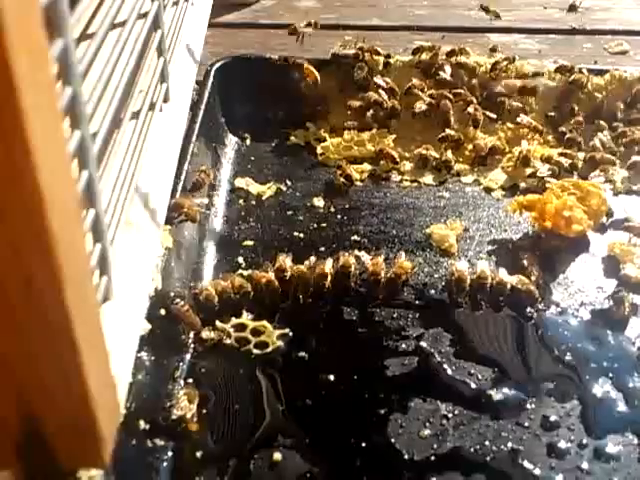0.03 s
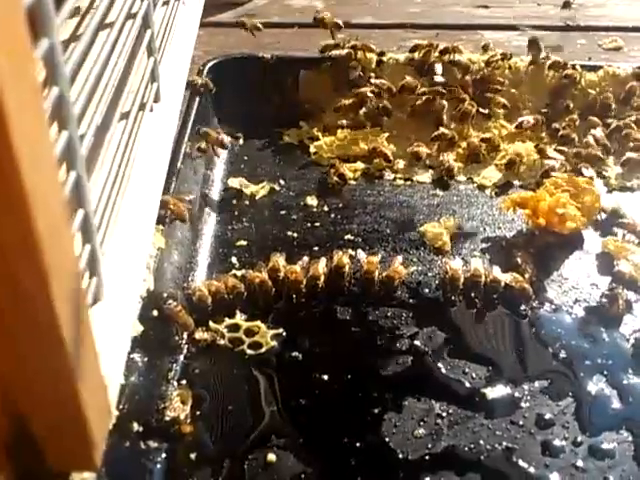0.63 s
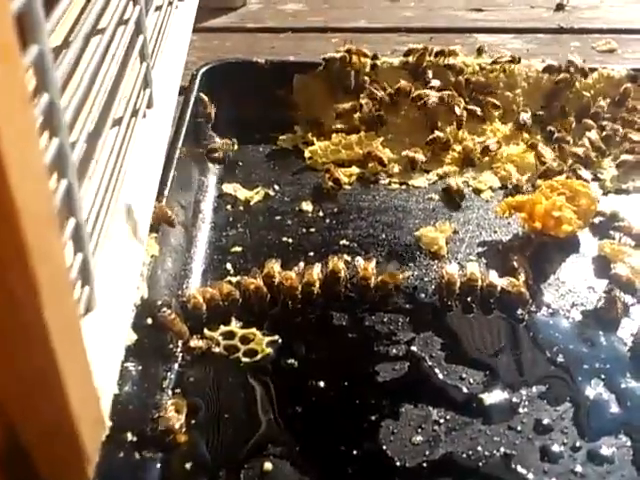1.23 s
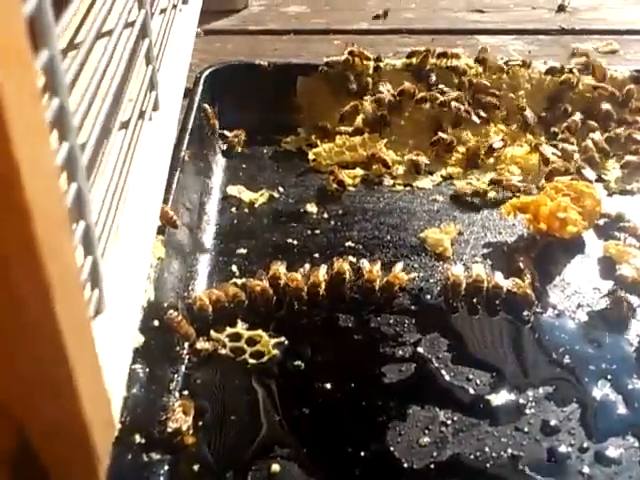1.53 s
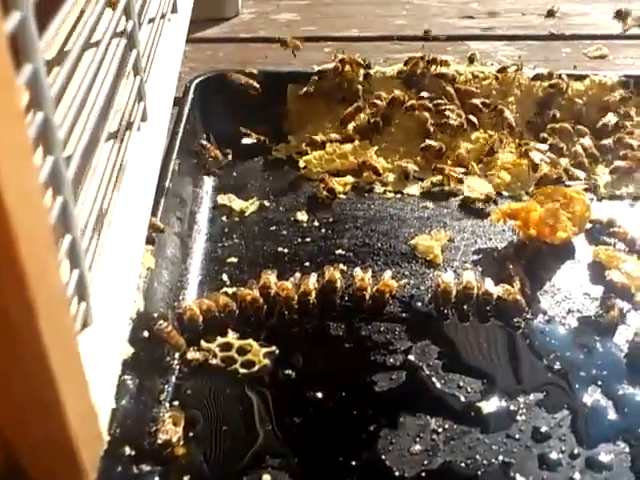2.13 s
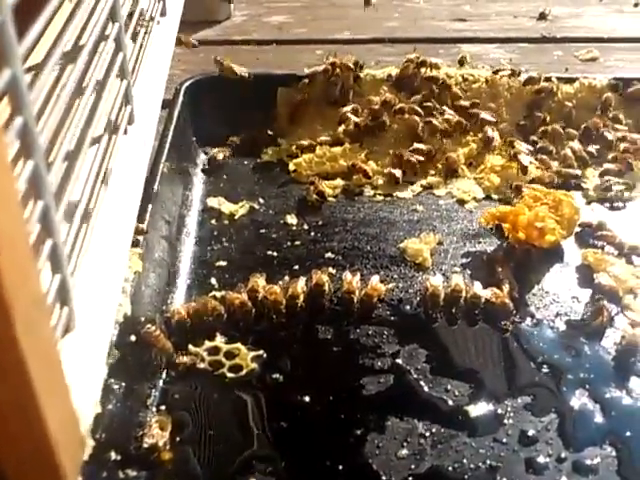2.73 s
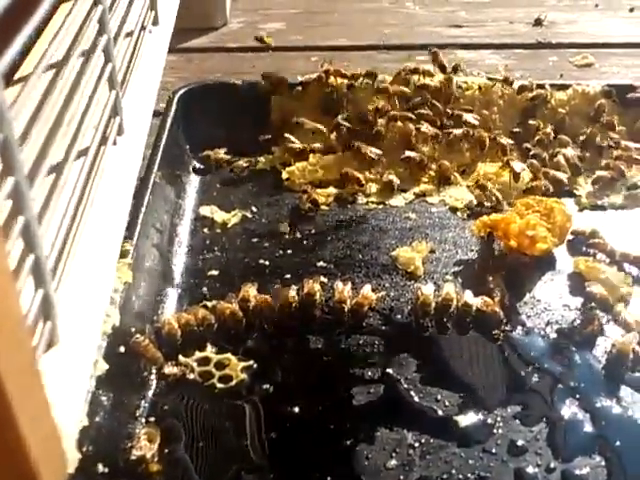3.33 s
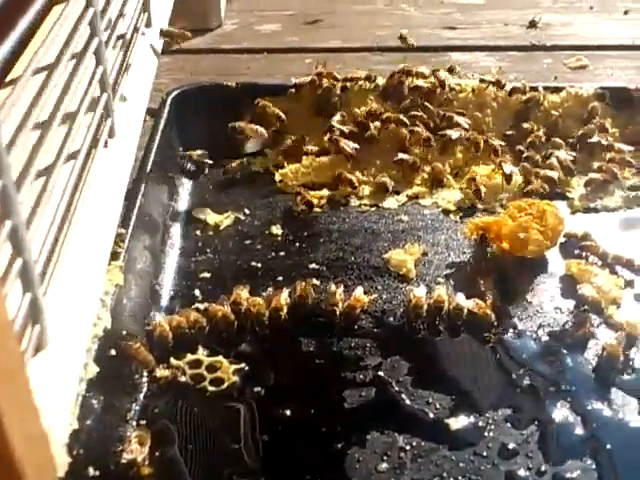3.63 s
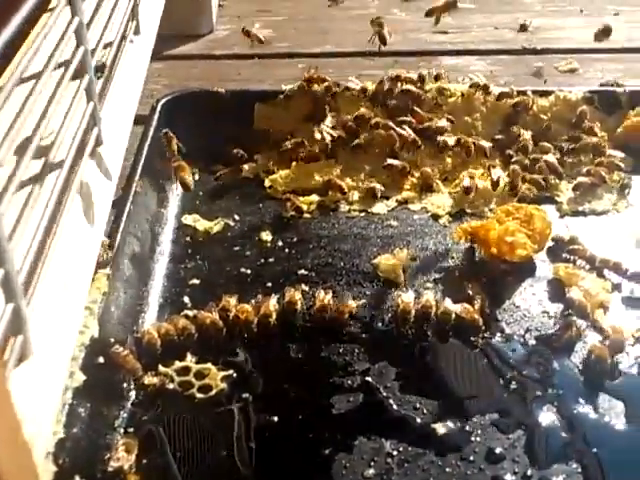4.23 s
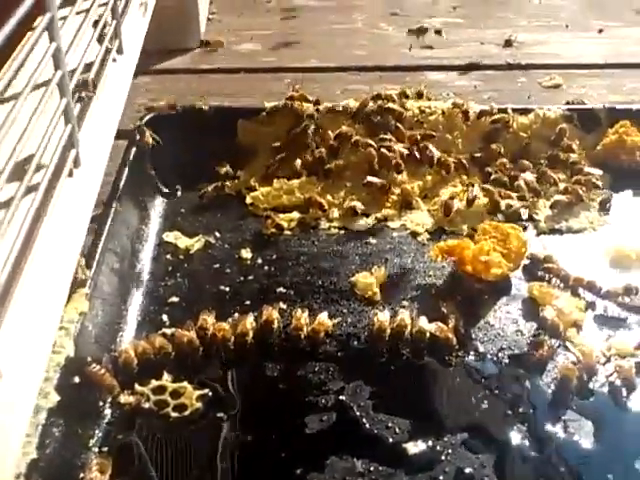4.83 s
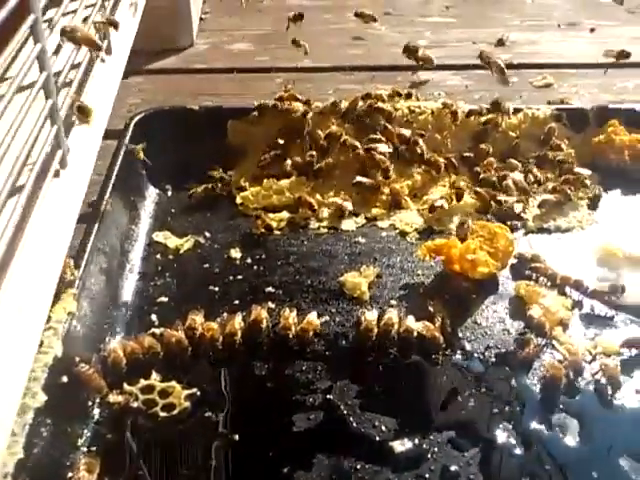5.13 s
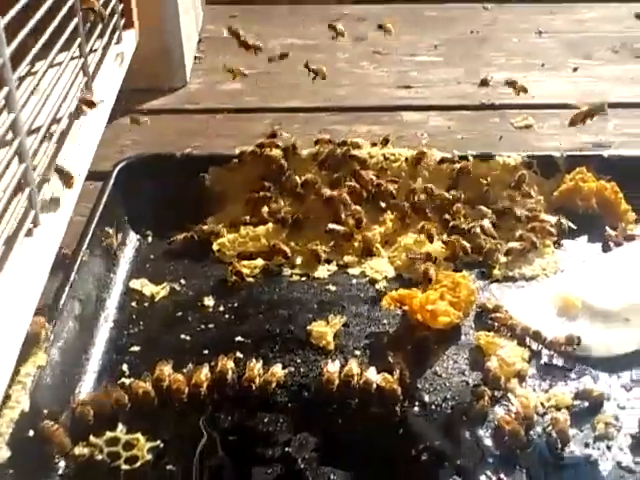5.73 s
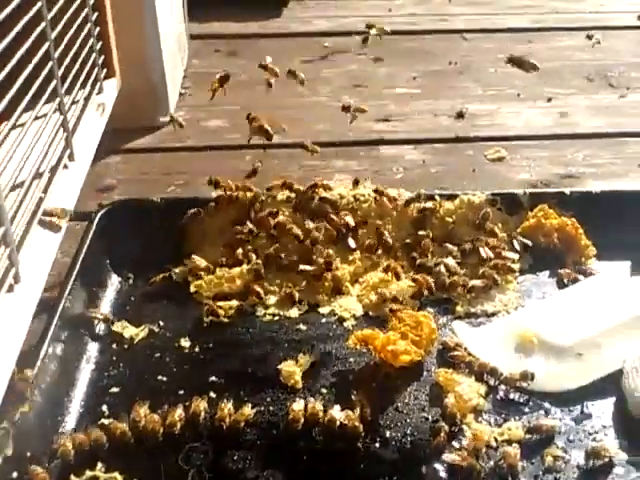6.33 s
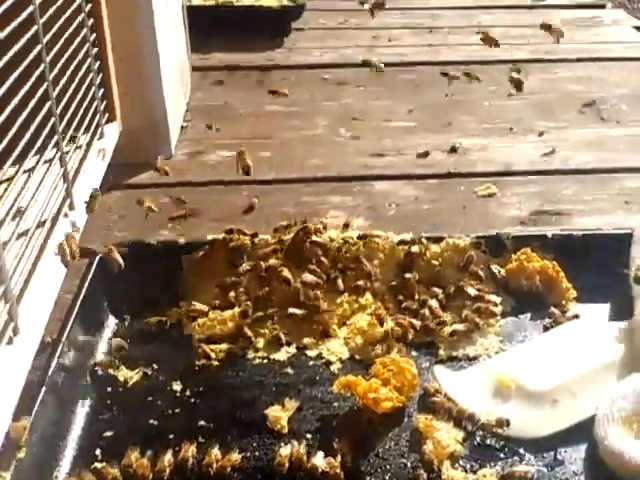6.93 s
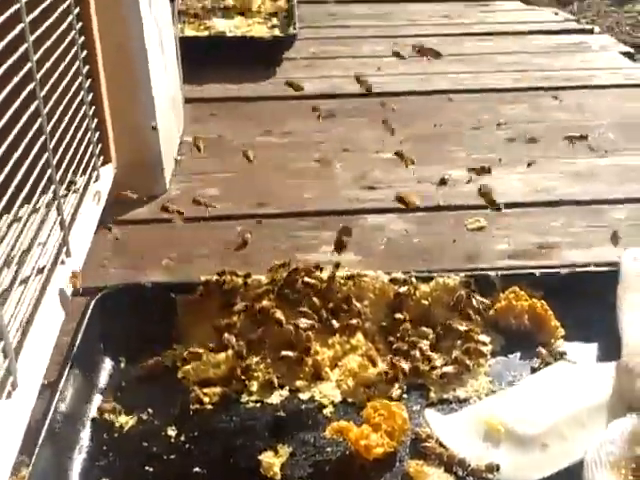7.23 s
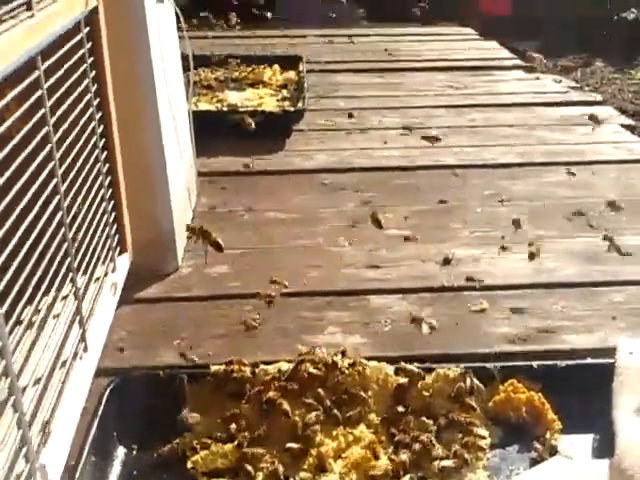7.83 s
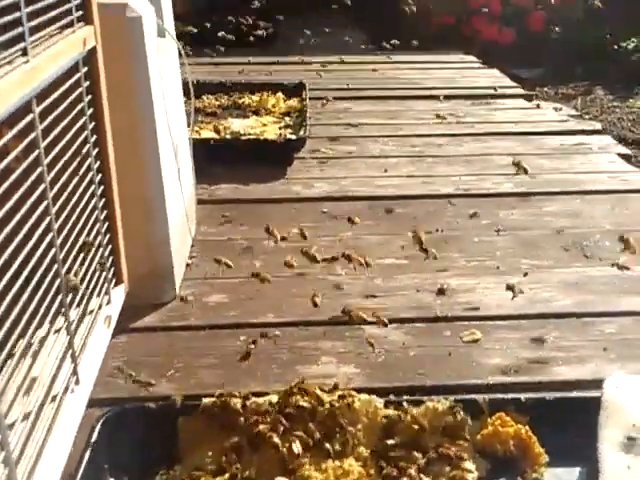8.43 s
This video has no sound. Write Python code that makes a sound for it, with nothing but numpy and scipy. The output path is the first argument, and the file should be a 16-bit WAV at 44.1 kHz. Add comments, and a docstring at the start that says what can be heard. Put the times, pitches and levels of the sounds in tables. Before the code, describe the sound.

After silence, a thick buzz of honeybees cuts in abruptly at about 0.9 seconds, heard from just above trays of honeycomb on an open deck. Dozens of wing tones wander and merge into a low hum with a raspy edge. It sags briefly, snaps back near 1.2 seconds, then stays steady until the end at about 8.7 seconds. Single bees keep passing close, each a short swell sinking slightly in pitch, most clearly around 2.6, 3.4, 4 to 4.7 and 5.5 to 6.3 seconds, and more faintly afterwards. An even, airy hiss lies on top throughout. Underneath are a low outdoor rumble and a far motor-like drone that swells and recedes, strongest near 3 seconds. Soft, short rustles brush by close to the microphone at about 2.8, 3.2, 4 and 5.8 seconds.

```python
"""A thick buzz of honeybees opens abruptly, heard from just above trays of honeycomb on an open deck.
Dozens of wing beats near 245 Hz wander and merge, coloured by reflections from boards and trays;
now and then a few bees come close. Under them lie a low outdoor rumble and a far motor-like drone.
On top sit an even hiss, coloured by each microphone port, and a few soft rustles."""
import sys
import numpy as np
from scipy.fft import rfft, irfft, next_fast_len
from scipy.io import wavfile
from scipy.ndimage import map_coordinates

SR = 44100
rng = np.random.default_rng(int(sys.argv[2]) if len(sys.argv) > 2 else 0)


def to_wav(s):
    """Save 16-bit WAV."""
    ch = np.atleast_2d(s).T  # columns
    pcm = np.round(np.clip(ch, -1, 1) * 32767)  # PCM
    wavfile.write(sys.argv[1], SR, pcm.astype(np.int16))


N = 383229

# The nearby swarm's ebb and flow. Each row: time in seconds, thickness in relative dB,
# lift of the raspy upper overtones in dB.
SWARM_EBB = [(1.3, -0.8, 0.7), (1.85, -1.5, -1.5), (2.35, -0.9, -0.3), (3.1, 1.5, -0.7), (3.45, -0.4, -0.2),
             (4.1, 1, 1.5), (4.7, 1.3, 1.5), (5.15, -0.3, 0.5), (5.75, 0.5, 0.9), (6.4, 0, -0.3),
             (7.35, -1.5, -1), (7.8, -0.6, 0), (8.69, -2, -0.5)]


def amp(db):
    """Decibels to gain."""
    return 10 ** (np.asarray(db) / 20)


def unit(x):
    """Scale to rms 1."""
    return x / np.sqrt(np.mean(x ** 2) + 1e-20)


def clock():
    """The time of every sample in seconds."""
    return np.arange(N) / SR


def along(points, hz):
    """Read (frequency, value) points on a log frequency axis."""
    f, v = np.transpose(points)
    return np.interp(np.log(hz + 1e-6), np.log(f), v)


def curves(rows):
    """One value per sample for each column after the time."""
    times, *columns = np.transpose(rows)
    return [np.interp(clock(), times, column) for column in columns]


def wobble(rate, size=1500):
    """A smooth random curve with `rate` knots a second."""
    times = np.linspace(0, N / SR, size)
    knots = rng.standard_normal(size)
    smooth = map_coordinates(knots, [times * rate + 10 * rng.random()], mode="mirror")
    return np.interp(clock(), times, smooth)


def swell(peak_s, half_width_s):
    """A bell-shaped rise and fall, about 17 dB down at one half-width from its peak."""
    return np.exp(-2 * np.minimum(((clock() - peak_s) / half_width_s) ** 2, 20))


def dip(deepest_s=1.22, fall_s=0.36, return_s=0.029):
    """Early on the level sags, then snaps back: 0 outside the dip, 1 at its deepest."""
    return np.interp(clock(), [deepest_s - fall_s, deepest_s, deepest_s + return_s], [0, 1, 0])


def filtered(x, response):
    """Shape x with a gain that depends on frequency."""
    size = next_fast_len(N + SR // 4)
    return irfft(rfft(x, size) * response(np.fft.rfftfreq(size, 1 / SR)), size)[..., :N]


def noise(response):
    """Two unrelated noises of a given colour, together at rms 1."""
    return unit(filtered(rng.standard_normal((2, N)), response))


def spread(pair):
    """Two unrelated signals become left and right: alike in the bass, unrelated in the treble."""
    # Each row: frequency in Hz, left-right likeness from 0 to 1.
    likeness = [(20, 0.4), (45, 0.94), (70, 0.99), (150, 1), (320, 0.96), (480, 0.94), (700, 1), (1000, 1),
                (1350, 0.73), (2500, 0.033)]
    turn = lambda hz: np.arccos(np.clip(along(likeness, hz), -1, 1)) / 2
    mid, side = filtered(pair, lambda hz: np.array([np.cos(turn(hz)), np.sin(turn(hz))]))
    return np.array([mid + side, mid - side])


def bee(beat_hz, depth_db=0, nasal_db=0, facing_db=2, harmonics=24, size=4096):
    """One bee's wing tone; the balance of its overtones depends on how it faces the listener."""
    # One wing beat. Each row: harmonic number, relative level in dB.
    # The second is strong, since up and down strokes both push air.
    wing_spectrum = [(1, 1), (2, 5.5), (3, -9), (4, -8.5), (5, -10), (6, -12), (7, -11.5), (9, -18.5),
                     (14, -17.5), (24, -22.5)]
    k = np.arange(1, harmonics + 1)
    nasal_band = np.exp(-((k - 5.2) / 1.3) ** 2 / 2)  # a bump around the fifth harmonic
    levels = along(wing_spectrum, k) + depth_db * (k == 1) + nasal_db * nasal_band
    levels += facing_db * rng.standard_normal(harmonics)
    partials = amp(levels) * np.exp(2j * np.pi * rng.random(harmonics))
    cycle = unit(irfft(np.append(0, partials), size))
    return cycle[(np.cumsum(beat_hz) * size / SR).astype(int) % size]


def deck(x):
    """Reflections from the boards, trays and railing ripple the spectrum of the buzz."""
    # Each row: frequency in Hz, boost or cut in dB.
    ripple = [(260, 0), (320, -2.5), (480, 2), (540, 0), (620, 1), (740, -1), (860, 0), (980, 1.5),
              (1040, 0.5), (1130, 3), (1440, -3), (1590, 1.5), (1750, -2.5), (2400, -1.5)]
    return filtered(x, lambda hz: amp(along(ripple, hz)))


def swarm(beat_hz=246, scatter_hz=23, wander_hz=6, flutter_hz=3.2, range_db=2.4, split_hz=620, count=48):
    """Each bee keeps its own wing beat, bends it as it steers, and swells as it drifts nearer."""
    groups = np.zeros((2, N))
    for i, offset in enumerate(np.linspace(-1, 1, count)):
        beat = beat_hz + scatter_hz * offset + wander_hz * wobble(4) + flutter_hz * wobble(23)
        groups[i % 2] += amp(range_db * wobble(4)) * bee(beat)
    crowd = deck(spread(groups))
    buzz = filtered(crowd, lambda hz: 1 / (1 + (hz / split_hz) ** 10))
    rasp = crowd - buzz
    thickness, rasp_lift = curves(SWARM_EBB)
    buzz_db = -49.5 + 0.94 * thickness + 0.5 * wobble(11) - 3 * dip()
    rasp_db = -50 + rasp_lift - 6 * dip()
    return amp(buzz_db) * unit(buzz) + amp(rasp_db) * unit(rasp)


def rumble(unrest_db=0.13, deep_rise_db_per_s=0.03, upper_fade_db_per_s=0.22):
    """A nearly mono outdoor bed in two gently surging layers; the upper one slowly fades."""
    # The colour of each layer. Each row: frequency in Hz, relative level in dB.
    deep_colour = [(15, -28), (30, -5.5), (50, -8.5), (68, 0), (90, -2), (115, -0.5), (140, 0), (175, -5),
                   (260, -29), (600, -48)]
    upper_colour = [(90, -21), (160, -2), (190, 0), (208, -2), (265, -1.5), (295, -8.5), (330, -8.5),
                    (420, -5.5), (620, -11.5), (1200, -25), (3000, -49)]
    # Surges and lulls. Each row: centre and half-width in seconds, deep and upper change in dB.
    surges = [(1.95, .2, 2.5, 0), (3.0, 0.76, 1.5, 2.7), (5.5, 0.42, 1, 1.5), (6.3, .4, -0.7, 0),
              (7.5, .25, 1.5, 0), (8.15, 0.49, -3, -1), (8.65, 0.13, 2, -1)]
    deep_db = -47 + deep_rise_db_per_s * clock() + unrest_db * wobble(3.95)
    upper_db = -46 - upper_fade_db_per_s * clock() + unrest_db * wobble(4)
    for centre_s, half_width_s, deep_change, upper_change in surges:
        surge = swell(centre_s, half_width_s)
        deep_db += deep_change * surge
        upper_db += upper_change * surge
    deep = amp(deep_db) * noise(lambda hz: amp(along(deep_colour, hz)))
    upper = amp(upper_db) * noise(lambda hz: amp(along(upper_colour, hz)))
    return spread(deep + upper)


def hum(hz, waver_db=1.2, drift_hz=1.21):
    """A pure tone that wavers in level and pitch."""
    level = np.sqrt(2) * amp(waver_db * wobble(8))
    pitch = hz + drift_hz * wobble(8)
    return level * np.sin(2 * np.pi * np.cumsum(pitch) / SR)


def drone(pitch_hz=153.4, sag_hz_per_s=0.9, floor_db=-59.5, fade_s=0.039):
    """A far motor-like drone swells and recedes, while weaker hums come and go around it."""
    # Each row: peak time in seconds, half-width in seconds, relative level in dB.
    swells = [(1.1, 0.32, -47.5), (1.62, .11, -50.5), (2.5, 0.55, -50.5), (3.02, 0.31, -45),
              (3.44, 0.18, -47.5), (4.42, 0.27, -49), (5.28, .36, -50), (6.75, 0.22, -54),
              (7.24, 0.15, -52.5), (7.6, .15, -52)]
    # Each row: start in seconds, end in seconds, pitch in Hz, relative level in dB.
    side_hums = [(0.77, 4.3, 104, -55), (4.7, 5.65, 130, -53.5), (0.63, 4.3, 395, -60.5),
                 (6.4, 10, 187, -65)]
    strength = amp(floor_db) + sum(amp(db) * swell(peak_s, width_s) for peak_s, width_s, db in swells)
    out = strength * hum(pitch_hz - sag_hz_per_s * clock())
    for start, end, hz, db in side_hums:
        gate = np.clip(np.minimum(clock() - start, end - clock()) / fade_s, 0, 1)
        out += amp(db) * gate * hum(hz)
    return out


def hiss(level_db=-43, flicker_db=0.5, dip_db=4):
    """Airy hiss that grows with the swarm, unrelated at two microphone ports with their own resonances."""
    # The colour of each port. Each row: frequency in Hz, relative level in dB.
    left_port = [(300, -1), (1200, -3.5), (2200, -6), (3200, -7), (4600, -7.5), (5800, -11.5), (7500, -7),
                 (9500, -0.5), (11500, -7), (13500, -11.5), (15700, -15)]
    right_port = [(300, -13.5), (1200, -2.5), (2200, -6), (3600, -4.5), (5000, -0.15), (6800, -5.5),
                  (8500, -6.5), (10500, -13.5), (12500, -16.5), (14000, -14.5), (15700, -14)]
    air = noise(lambda hz: amp([along(left_port, hz), along(right_port, hz)]))
    thickness, _ = curves(SWARM_EBB)
    return amp(level_db + 0.75 * thickness - dip_db * dip() + flicker_db * wobble(60)) * air


def close_bees(glide_hz_per_s=-8, flutter_hz=5.5, apart_hz=4.5, flicker_db=1.5, count=3):
    """A few bees stand out for a moment, sinking in pitch as they go by and flickering as they turn."""
    # Each row: peak time in seconds, half-width in seconds, wing beat in Hz, relative level in dB,
    # extra dB on the fundamental (depth), extra dB on the middle overtones (nasal).
    fly_bys = [(1.347, .22, 244.7, -44.5, -5, 4), (1.73, 0.18, 240, -45, 9, 0), (2.3, .16, 246, -53, -8, 1),
               (2.64, .14, 255, -41.5, 6, 0), (3.09, .14, 244.5, -47, -5, 9),
               (3.387, .17, 247.8, -42, 13, 0), (3.803, .12, 254.7, -45.5, 6, 0),
               (4.08, 0.09, 249, -43.5, 18, 0), (4.264, 0.083, 233, -45, 9, 0),
               (4.53, .14, 256.6, -43.5, 9, 8), (4.657, 0.2, 266, -46.5, -9, 14),
               (4.98, .2, 235.5, -46, 2, -2), (5.37, 0.12, 222, -47, -6, 15),
               (5.57, 0.12, 248.5, -45.5, 6, 0), (5.789, .2, 245.6, -43.5, -5, 1),
               (6.325, .17, 238, -43.5, -12, 2), (6.74, .12, 246, -50.5, -12, -2),
               (7.12, 0.13, 245, -49, 9, 5), (7.6, .13, 254.5, -50, -4, 0), (7.797, .19, 251.7, -49, 0, 10),
               (8.197, .26, 240, -48, -2, 0), (8.6, .14, 240.6, -47, 4, 0)]
    out = np.zeros(N)
    for peak_s, half_width_s, hz, db, depth_db, nasal_db in fly_bys:
        beat = hz + glide_hz_per_s * np.clip(clock() - peak_s, -half_width_s, half_width_s)
        cluster = sum(bee(beat + apart_hz * offset + flutter_hz * wobble(19), depth_db, nasal_db)
                      for offset in np.linspace(-1, 1, count))
        out += amp(db + flicker_db * wobble(16)) * swell(peak_s, half_width_s) * unit(cluster)
    return amp([[-4.5], [-3.5]]) * deck(out)  # just right of centre


def rustles():
    """Short, soft brushing sounds close by, each a swell of treble noise."""
    # Each row: peak time and half-width in seconds, band centre in Hz, width in octaves, level in dB.
    brushes = [(2.76, 0.062, 9300, 0.21, -47), (3.15, 0.24, 9000, 0.5, -52),
               (4.007, 0.02, 4500, 0.71, -41.5), (5.77, 0.16, 5100, 0.3, -50)]
    out = np.zeros((2, N))
    for peak_s, half_width_s, centre_hz, octaves, db in brushes:
        band = noise(lambda hz: np.exp(-(np.log2((hz + 1) / centre_hz) / octaves) ** 2 / 2))
        out += amp(db) * swell(peak_s, half_width_s) * band
    return out


def scene(lean_right_db=1.96):
    """Bees, rumble and drone lean a little to the right, under the hiss and rustles."""
    field = swarm() + close_bees() + rumble() + drone()
    balance = amp([[-lean_right_db / 2], [lean_right_db / 2]])
    return field * balance + hiss() + rustles()


def record(dry):
    """The sound cuts in from silence, with its highest treble shaved off."""
    start_s, fade_in_s, top_hz = 0.877, 0.0037, 15750
    gate = np.clip((clock() - start_s) / fade_in_s, 0, 1)
    return filtered(dry * gate, lambda hz: np.clip((top_hz - hz) / 200 + 0.5, 0, 1))


dry = scene()
out = record(dry)
to_wav(out)
```